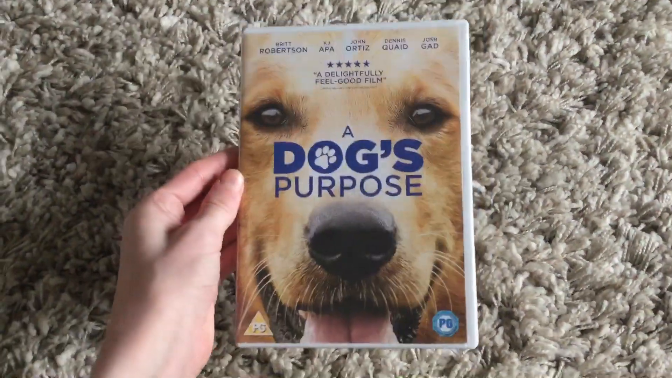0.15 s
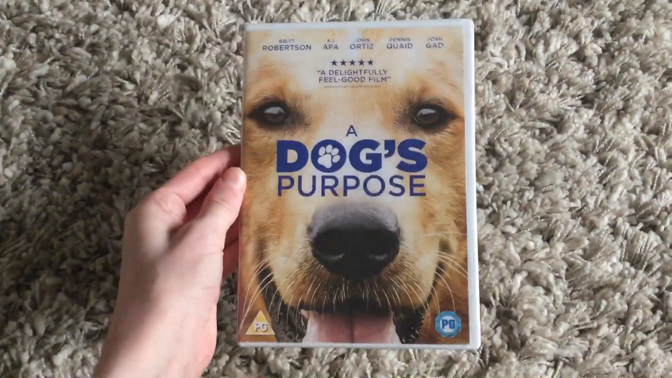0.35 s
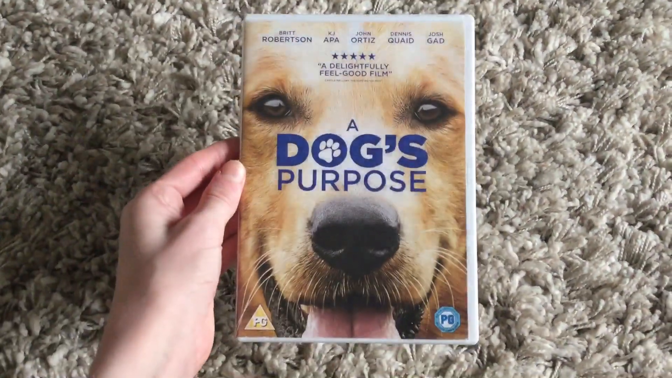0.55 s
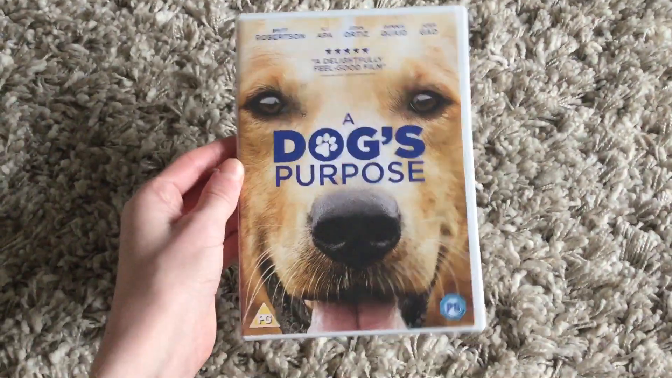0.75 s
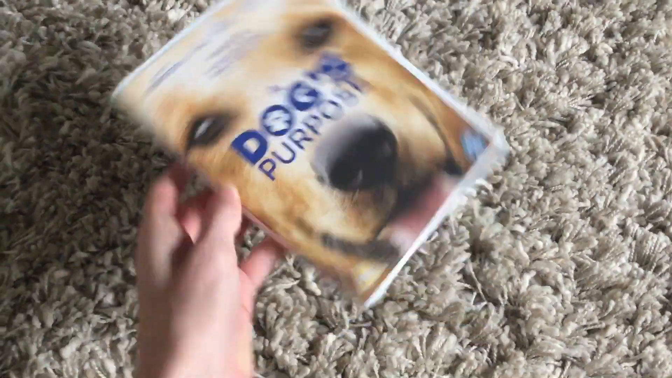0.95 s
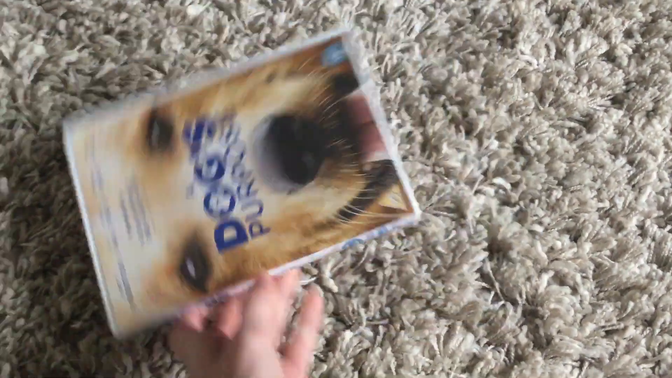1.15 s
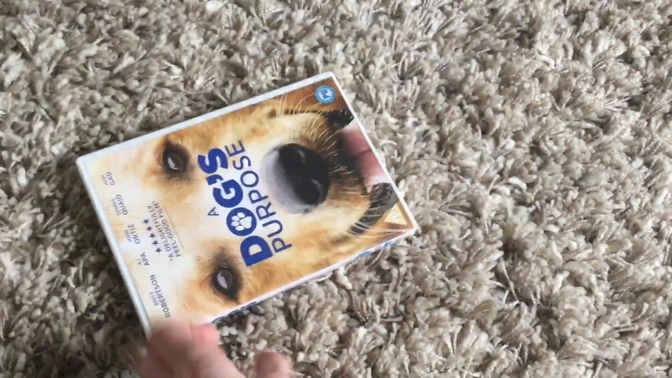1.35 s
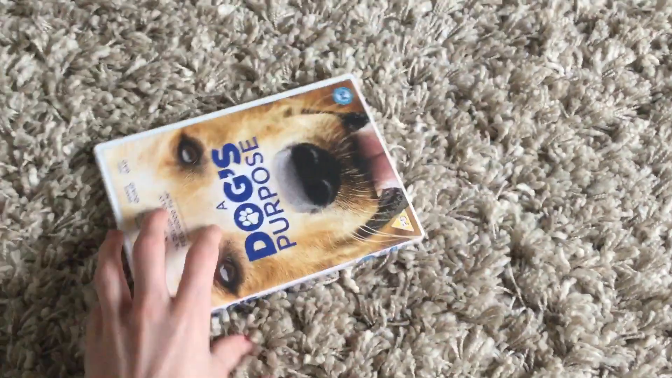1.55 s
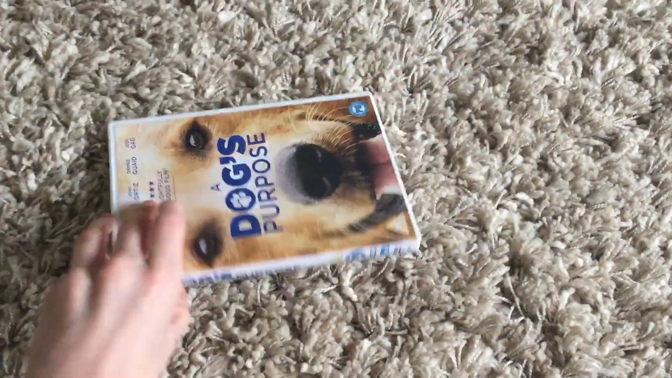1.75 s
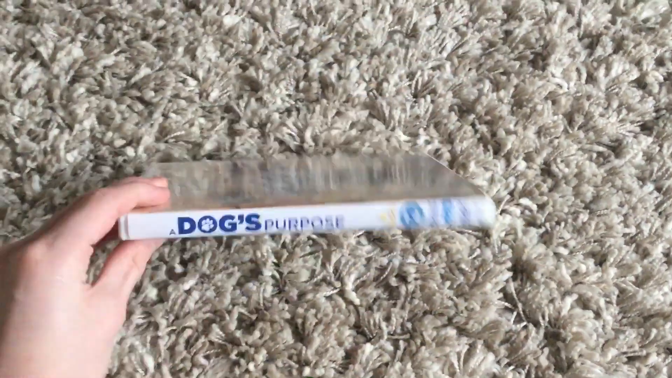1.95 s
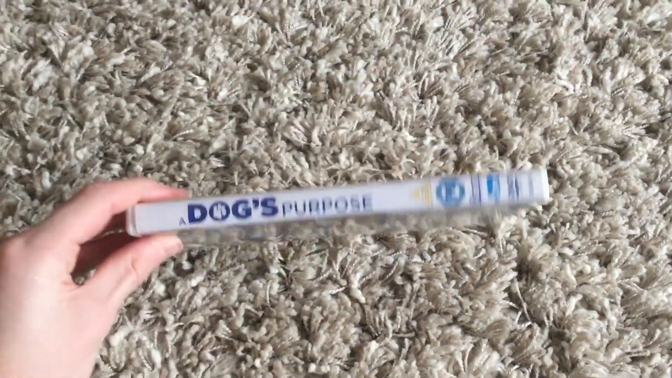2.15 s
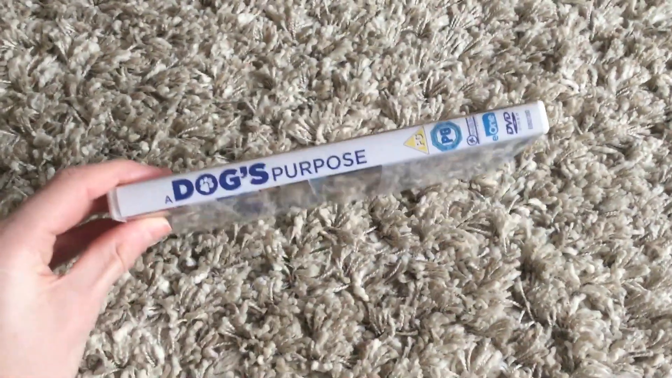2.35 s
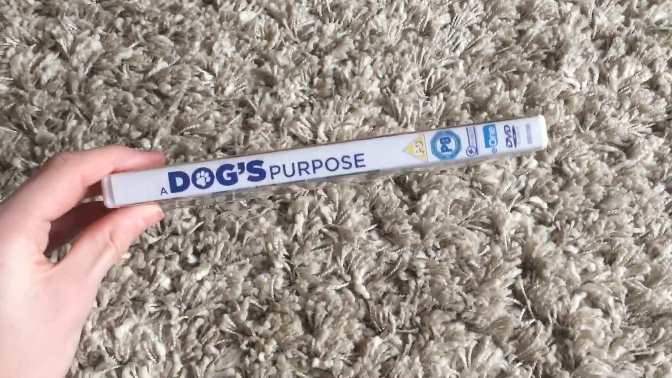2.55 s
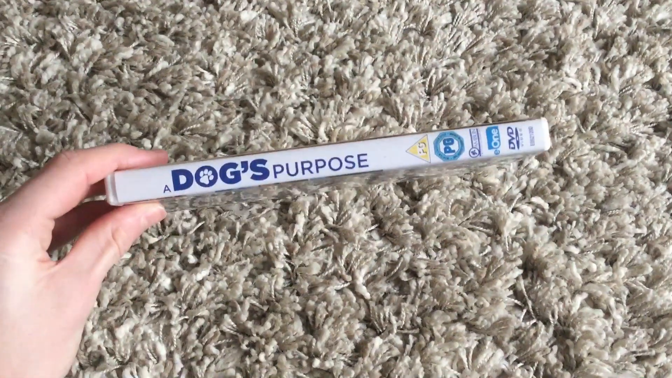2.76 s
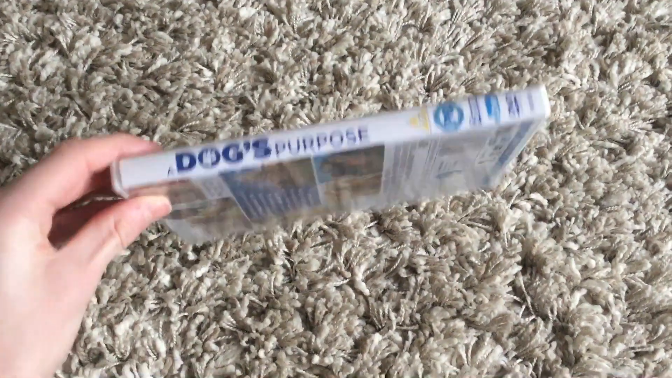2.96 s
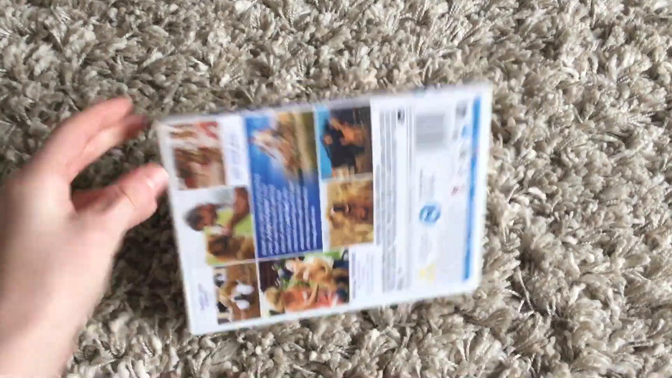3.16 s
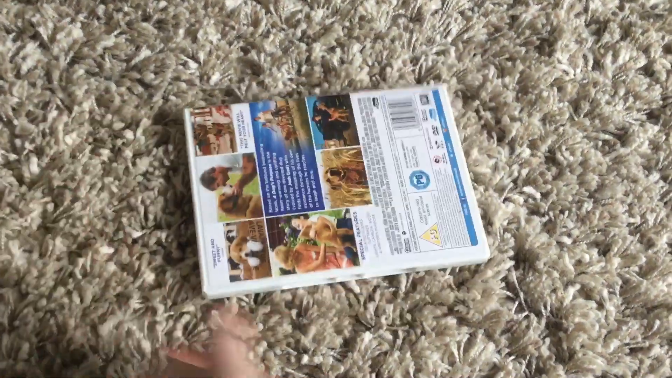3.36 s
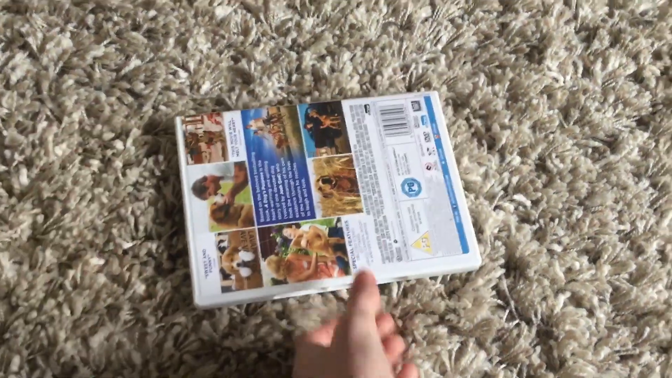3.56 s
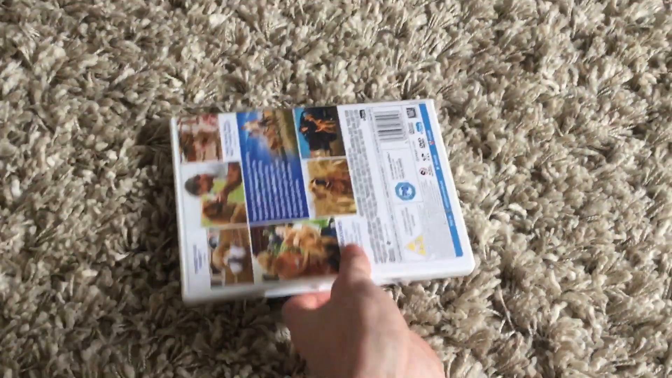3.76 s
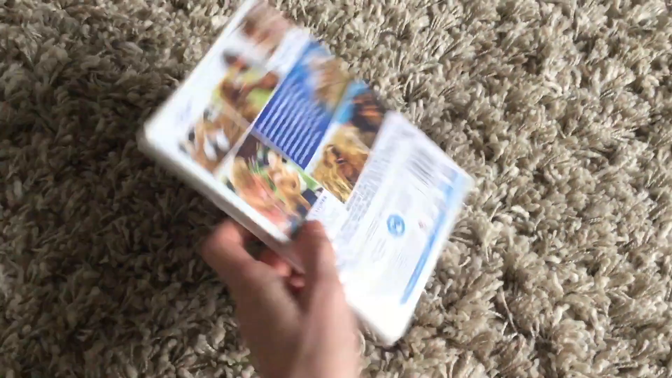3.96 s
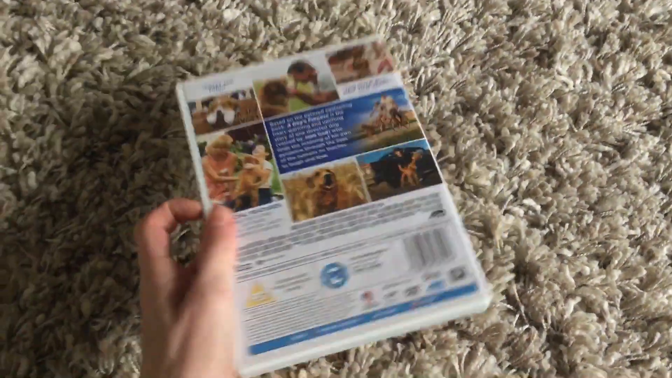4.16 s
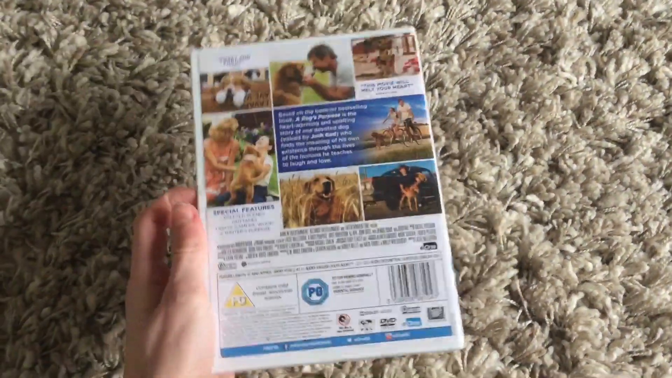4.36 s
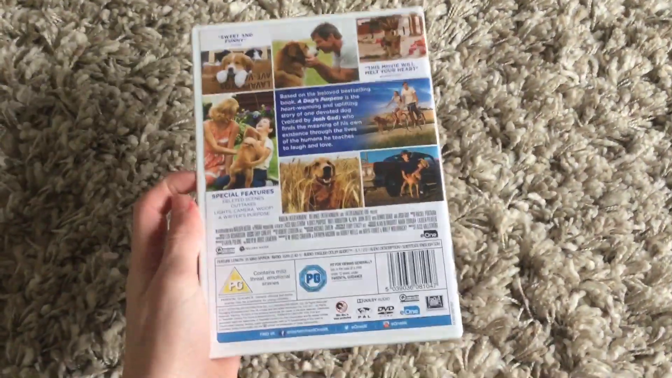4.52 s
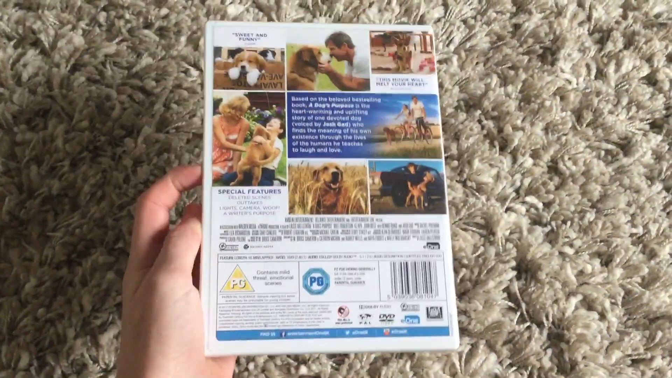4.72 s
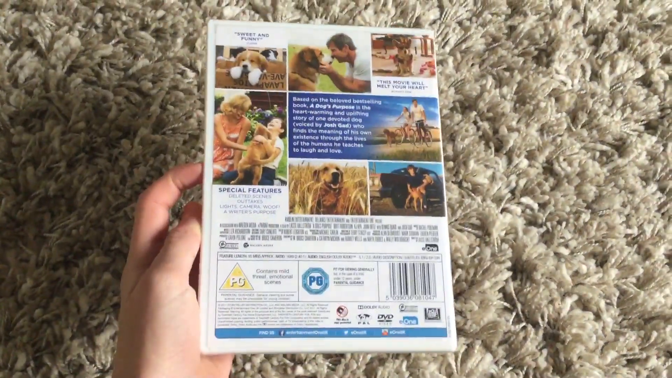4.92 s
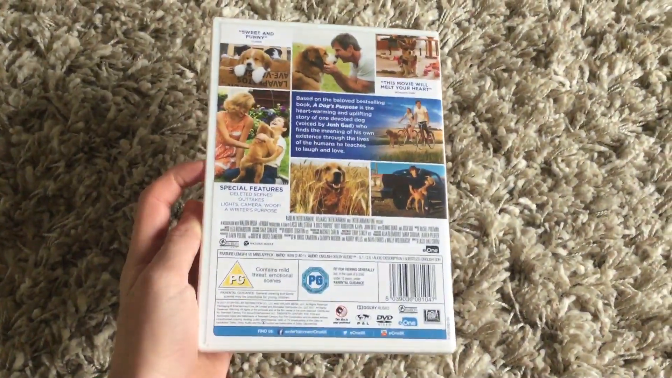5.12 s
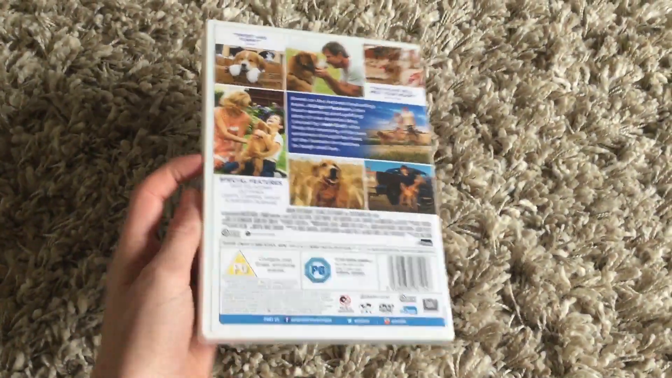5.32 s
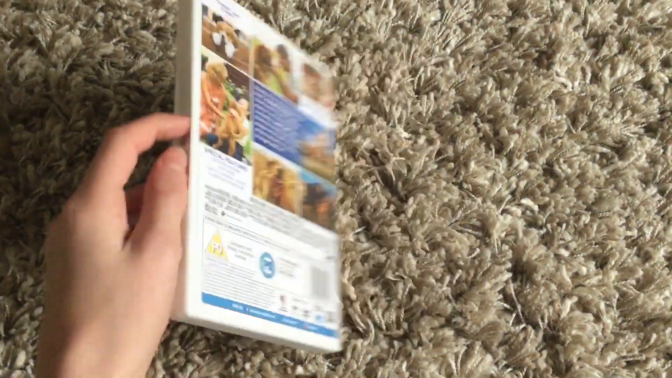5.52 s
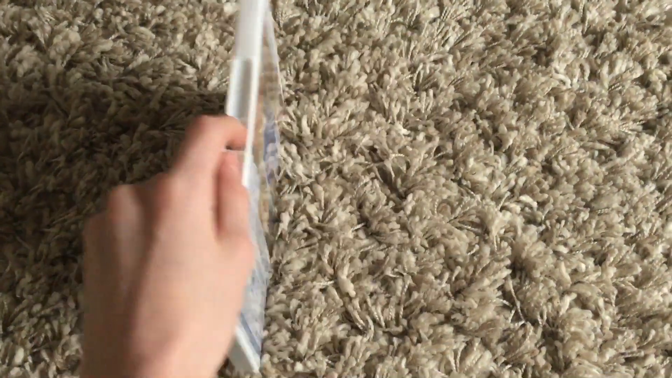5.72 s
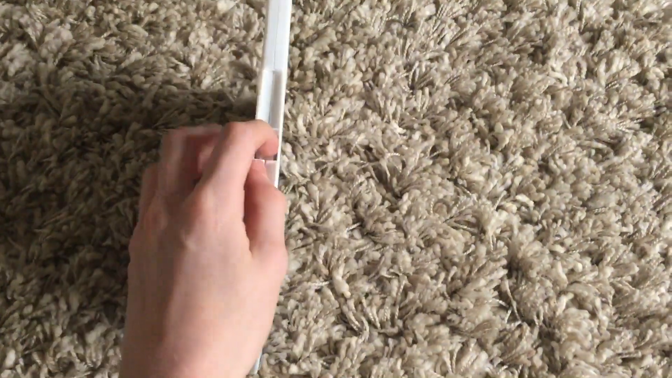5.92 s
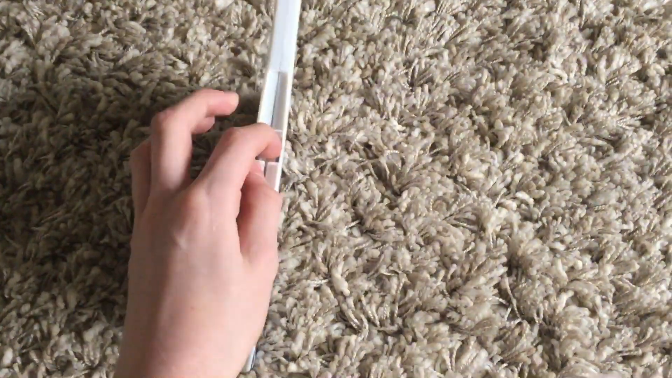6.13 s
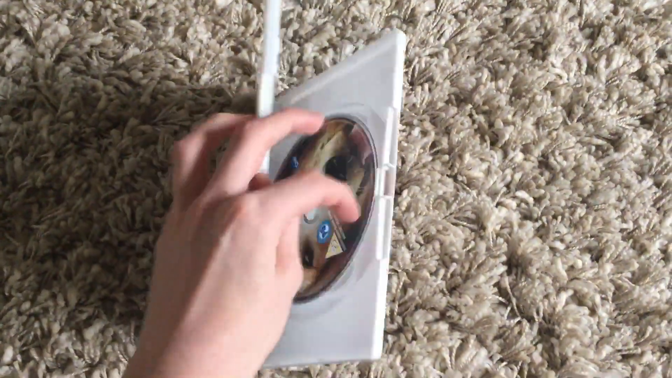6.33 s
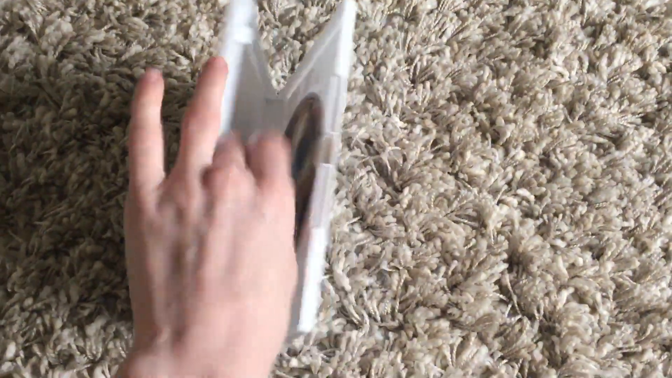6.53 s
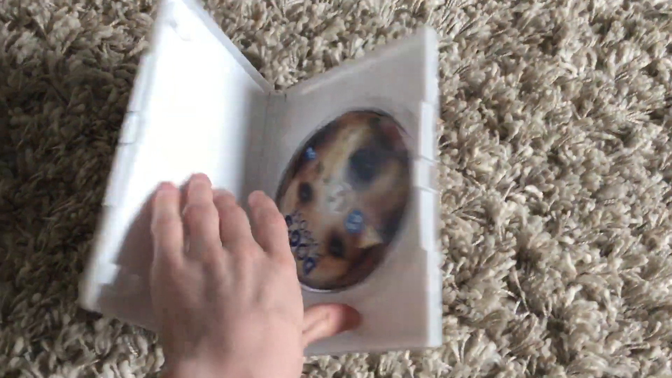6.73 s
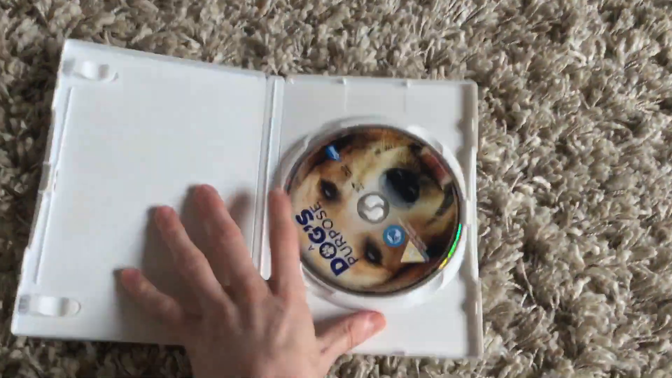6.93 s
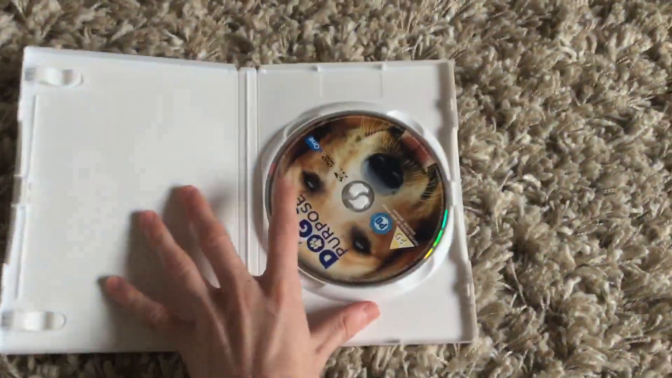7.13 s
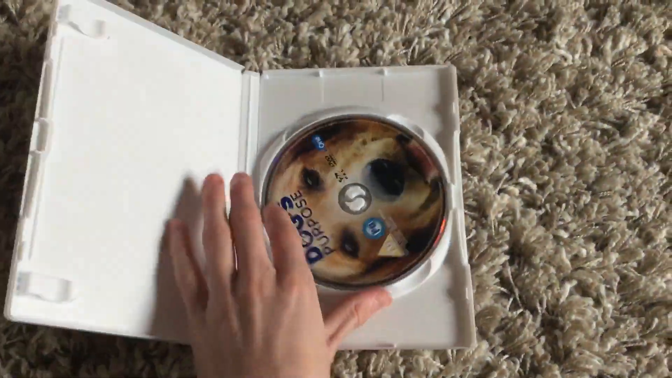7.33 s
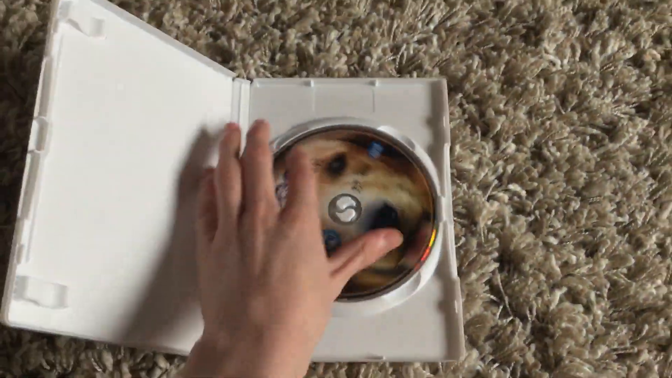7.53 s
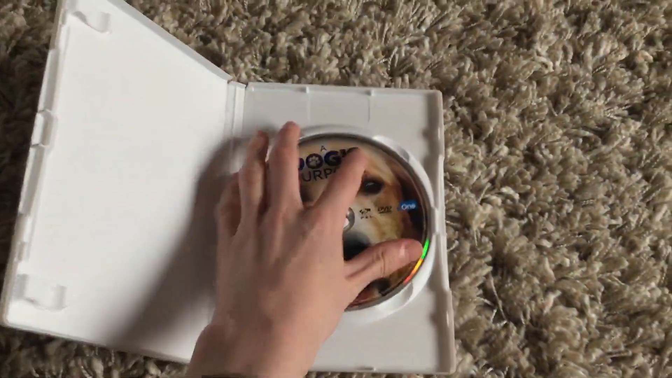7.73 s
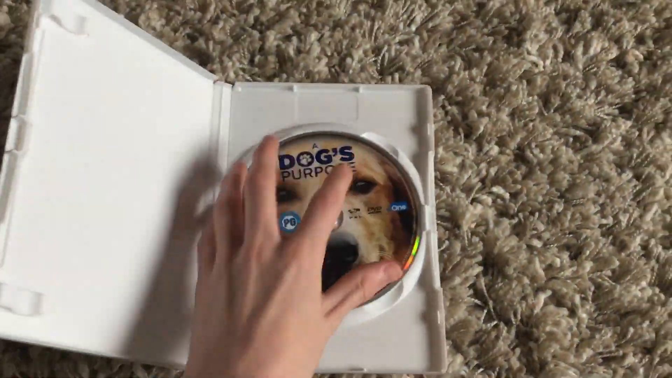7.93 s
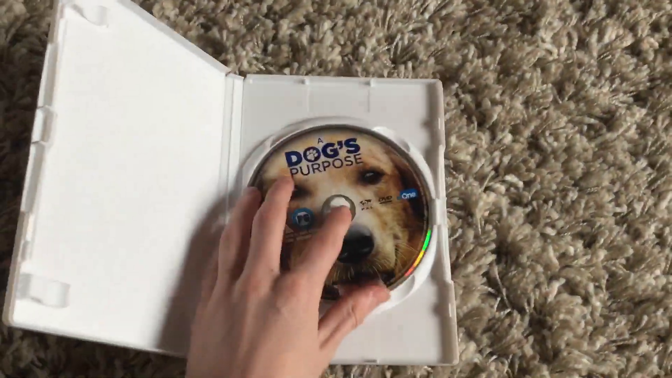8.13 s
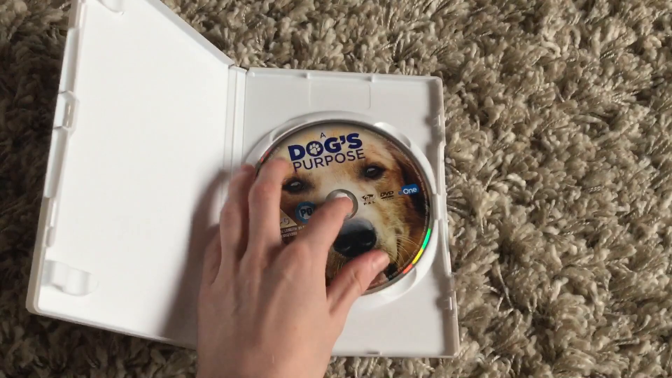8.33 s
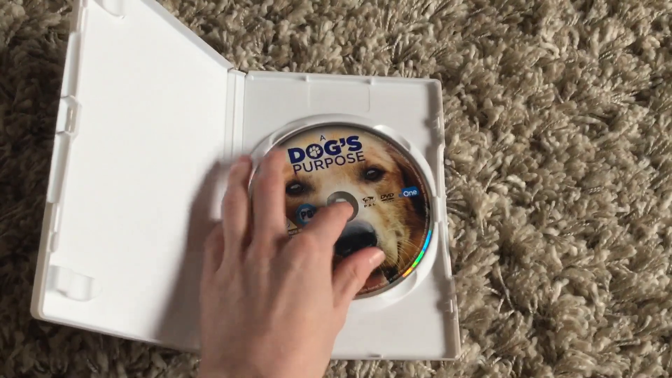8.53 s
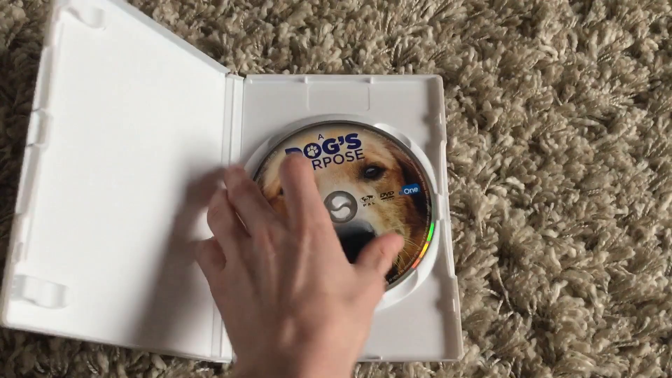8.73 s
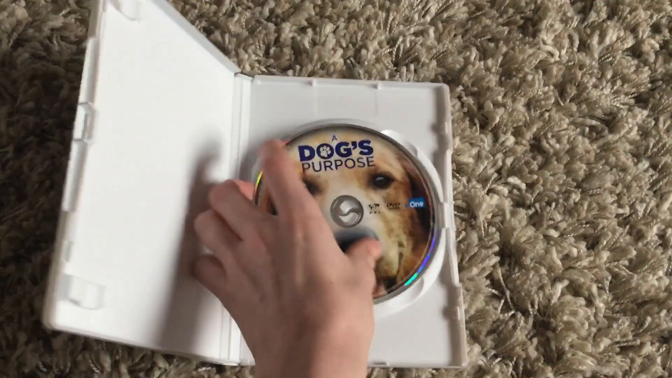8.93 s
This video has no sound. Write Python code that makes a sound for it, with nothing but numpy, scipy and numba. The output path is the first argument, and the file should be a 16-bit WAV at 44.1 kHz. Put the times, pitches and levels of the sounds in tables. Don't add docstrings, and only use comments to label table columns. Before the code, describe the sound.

A quiet, small furnished room with a faint steady air hush; the microphone is close. Nearly silent at first, with tiny finger creaks from 0.75 s. Padded knocks and light plastic clicks come around 1.2, 1.5, 1.6 and 1.9 s. After a lull, the hollow case shifts near 3 s and drops at 3.2 s with a bright bouncing clatter and a dull carpet thump, then grinds briefly. From 3.7 to 4.5 s it is turned with crisp ticks, knocks and seam creaks. Mostly quiet with faint touches until the latches burst open at 6.25 s, a loud hard snap. The lid chatters and slides at 6.5-6.7 s, with small squeaks. A catch sounds at 7.04 s, then the disc scrapes and squeaks round at 7.25-7.7 s. Clicks at 8.0 s, the loudest sharp pop at 8.42 s, another snap at 8.76 s, then rattles and a final scrape near 9 s.

```python
import sys
import numpy as np
from scipy import signal
from scipy.fft import rfft, irfft, next_fast_len
from scipy.io import wavfile
from scipy.ndimage import uniform_filter1d
from numba import njit

SR = 44100
rng = np.random.default_rng(int(sys.argv[2]) if len(sys.argv) > 2 else 0)


def field_ratio(decibels):
    return 10 ** (np.asarray(decibels, dtype=float) / 20)


def inscribe(sig):
    pcm = np.round(np.clip(np.atleast_2d(sig).T, -1, 1) * 32767)
    wavfile.write(sys.argv[1], SR, pcm.astype(np.int16))


N = 400428
COARSE_S = np.arange(0, N + 16, 16) / SR


def band(x, lo_hz, hi_hz):
    return signal.sosfilt(signal.butter(2, [lo_hz, hi_hz], "bandpass", fs=SR, output="sos"), x)


def unit(x):
    return x / np.sqrt(np.mean(x ** 2))


def fine(control):
    return np.interp(np.arange(N) / SR, COARSE_S, control)


def curve(rows, column, rest=-120):
    rows = np.array(rows)
    return np.interp(COARSE_S, rows[:, 0], rows[:, column], left=rest, right=rest)


def swell(s, hold_s, rise_db_per_s, fall_db_per_s):
    before_s = np.maximum(s - COARSE_S, 0)
    after_s = np.maximum(COARSE_S - s - hold_s, 0)
    return -rise_db_per_s * before_s - fall_db_per_s * after_s


def leader(db, hz):
    top = np.argmax(db, axis=0)[None]
    top_db = np.take_along_axis(np.array(db), top, axis=0)[0]
    return top_db, np.take_along_axis(np.array(hz), top, axis=0)[0]


def walk(rate_hz):
    hold = int(SR / rate_hz)
    levels = rng.standard_normal(N // 30)[:N // hold + 1]
    return 1.2 * uniform_filter1d(np.repeat(levels, hold), hold)[:N]


def coloured(points):
    hz, db = np.transpose(points)
    size = next_fast_len(N)
    f = np.maximum(np.arange(size // 2 + 1) * SR / size, 1)
    gain = field_ratio(np.interp(np.log(f), np.log(hz), db))
    return unit(irfft(rfft(rng.standard_normal(size)) * gain, size)[:N])


@njit
def svf(x, hz, width_hz):
    y, b, l = np.empty(len(x)), 0., 0.
    for i in range(len(x)):
        g, k = np.tan(np.pi * hz[i] / SR), width_hz / hz[i]
        v = (b + g * (x[i] - l)) / (1 + g * (g + k))
        b, l, y[i] = 2 * v - b, l + 2 * g * v, k * v
    return y


def ring(x, hz, width_hz):
    return svf(x, np.full(len(x), 1. * hz), 1. * width_hz)


# (frequency [Hz], width [Hz], level [dB])
SHUT_MODES = [(660, 94, -1), (1000, 110, -3), (1220, 140, -6.5), (2020, 310, -9), (2160, 59, -8),
              (2590, 96, -7.5), (3130, 210, -11), (3900, 140, -7.5), (4540, 340, -16), (5760, 490, -14.5),
              (6680, 480, -14.5), (8580, 700, -13), (11100, 1300, -26.5)]
# (frequency [Hz], width [Hz], level [dB])
OPEN_MODES = [(635, 120, -10), (1050, 620, -9.5), (1432, 130, -1.5), (1680, 880, -10), (2130, 840, -17),
              (2550, 170, -21.5), (3060, 110, -9.5), (3750, 53, -14.5), (4870, 100, -13),
              (5380, 1700, -18.5), (7080, 630, -11), (8460, 750, -16.5), (9700, 3700, -21.5),
              (11320, 7800, -24.5)]
MODES = SHUT_MODES + OPEN_MODES
OPENED_S = 6.24


def heard(k, s):
    return (k >= len(SHUT_MODES)) == (s >= OPENED_S)


def resonance(f, hz, width_hz):
    return 1j * f * width_hz / (hz ** 2 - f ** 2 + 1j * f * width_hz)


def shell(f, s, spread_db, direct_db):
    response = field_ratio(direct_db)
    for k, (hz, width_hz, db) in enumerate(MODES):
        gain = (-1) ** k * heard(k, s) * field_ratio(db + spread_db[:, k, None])
        response = response + gain * resonance(f, hz, width_hz)
    return response


# (low edge [Hz], high edge [Hz])
HIT_BANDS = [(170, 750), (750, 6000), (6000, 16000)]
HIT_SIZE, LEAD = 4096, 900


def hits(table, ring_db, ring_q, rise, thud_stretch, lead_db, edge):
    s, db, hz, thud_db, crack_db, t60_ms = (c[:, None] for c in np.transpose(table))
    chance = rng.standard_normal((len(table), HIT_SIZE + len(MODES)))
    noise, spread_db = chance[:, :HIT_SIZE], 2.5 * chance[:, HIT_SIZE:]
    t = (np.arange(HIT_SIZE) - LEAD) / SR
    lead_in = (t < 0) * field_ratio(lead_db) * np.exp(np.minimum(t, 0) / 0.0024)
    f = np.arange(HIT_SIZE // 2 + 1) * SR / HIT_SIZE
    body = shell(f, s, spread_db, -22) + field_ratio(ring_db) * resonance(f, hz, hz / ring_q)
    sound = 0
    for edges_hz, rel_db, stretch in zip(HIT_BANDS, (thud_db, 0, crack_db), (thud_stretch, 1, .8)):
        age = np.maximum(t, 0) / (np.maximum(t60_ms, 3) * stretch / 1000)
        push = (1 - np.exp(-age / rise)) * field_ratio(-60 * age) + lead_in * (stretch == 1)
        force = push * noise + edge * (t == 0)
        part = band(irfft(rfft(force) * body, HIT_SIZE), *edges_hz)
        sound = sound + field_ratio(db + rel_db) * part / np.abs(part).max(axis=1, keepdims=True)
    out = np.zeros(N + HIT_SIZE)
    np.add.at(out, (s * SR).astype(int) - LEAD + np.arange(HIT_SIZE), sound)
    return out[:N]


THUD_DB = dict(knock=-4.5, click=-93, tick=-21, tray=-2.5, snap=-14.5, latch=-13, chatter=-7.5)
CRACK_DB = dict(knock=-10.5, click=-12.5, tick=-25)


def contacts(table, kind):
    rows = []
    for s, db, hz, t60_ms, *own in table:
        crack_db = own[0] if own else CRACK_DB[kind]
        rows.append((s, db, hz, THUD_DB[kind], crack_db, t60_ms))
    return rows


def taps(table, kind):
    return hits(contacts(table, kind), 2.6, 21, 0.0038, 2.3, -20.0, 2.8)


def patches(rows, q, grain_db):
    out = np.zeros(N + SR)
    for s, length_s, db, from_hz, to_hz in rows:
        size = int(length_s * SR)
        noise, grain = rng.standard_normal((2, SR // 4))[:, :size]
        hz = np.geomspace(from_hz, min(to_hz, .4 * SR), size)
        slips = noise * field_ratio(grain_db * unit(uniform_filter1d(grain, size=90)))
        width_hz = np.sqrt(from_hz * to_hz) / q
        tone = unit(svf(svf(slips, hz, width_hz), hz, width_hz))
        out[int(s * SR):][:size] += field_ratio(db) * tone * np.sqrt(np.hanning(size))
    return out[:N]


def swings(table, rise_s):
    out, t = np.zeros(N + SR), np.arange(SR) / SR
    for s, db, hz, t60_s in table:
        envelope = field_ratio(db - 60 * t / t60_s) * (1 - np.exp(-t / rise_s))
        out[int(s * SR):][:SR] += envelope * np.sin(2 * np.pi * hz * t)
    return out[:N]


def grinding(rows, modes, grip, grain_db, direct_db):
    bite, fade, patchy_db = grip
    grains = band(rng.standard_normal(N) * field_ratio(grain_db * walk(700)), 400, 12000)
    level_db = np.max([db + swell(s, hold_s, bite, fade) for s, hold_s, db in rows], axis=0)
    gains = [(-1) ** k * field_ratio(db + patchy_db * walk(45)) for k, (_, _, db) in enumerate(modes)]
    drift = 1 + .015 * walk(25)

    def bent(x):
        out = field_ratio(direct_db) * x
        for gain, (hz, width_hz, _) in zip(gains, modes):
            out = out + gain * svf(x, hz * drift, 1. * width_hz)
        return out

    return bent(grains * fine(field_ratio(level_db))) / np.std(bent(grains))


# (frequency [Hz], level [dB per Hz])
AIR_COLOUR = [(120, -16), (200, -3), (347, -7.5), (374, -11), (581, -15), (991, -19), (1660, -23.5),
              (2070, -25.5), (3530, -24.5), (10800, -32), (16200, -29.5)]
# (frequency [Hz], width [Hz], level [dB])
DUCT_MODES = [(1650, 150, -86), (3660, 220, -91.5), (8850, 1100, -89.5)]


def air():
    ducts = sum(field_ratio(db) * unit(ring(rng.standard_normal(N), hz, w)) for hz, w, db in DUCT_MODES)
    return field_ratio(-70.5 + .5 * walk(1.1)) * coloured(AIR_COLOUR) + ducts


# (frequency [Hz], level [dB per Hz])
THUMP_COLOUR = [(15, -43), (25, -20), (64, 7), (182, -2.5), (300, -19), (390, -41.5), (660, -120)]
# (time [s], level [dB], frequency [Hz], build [dB/s], fade [dB/s])
BUMPS = [(0.53, -67, 151.9, 4.5, 7.5), (1.259, -55.5, 91.1, 158.5, 234.5), (1.62, -61.5, 154, 30.5, 40.5),
         (2.219, -60, 99.2, 43, 33.5), (3.242, -46, 147.3, 117, 64.5), (3.72, -59.5, 104, 20, 18),
         (3.939, -56, 166.7, 51, 140), (5.92, -62.5, 93.1, 19, 26.5), (6.253, -40.5, 124.8, 367.5, 166.5),
         (6.653, -60, 161.1, 28.5, 92.5), (7.16, -60.5, 97, 37.5, 10), (8.422, -48.5, 141.8, 540.5, 235),
         (8.75, -58.5, 146, 38.5, 38.5)]
REST_DB, REST_HZ = -69.5, 110


def thumps(width_hz=30, broad=1.0):
    rumble = coloured(THUMP_COLOUR)
    levels_db = [db + swell(s, 0, rise, fall) for s, db, _, rise, fall in BUMPS]
    pitches_hz = [row[2] + 0 * COARSE_S for row in BUMPS]
    db, hz = leader(levels_db + [REST_DB + 0 * COARSE_S], pitches_hz + [REST_HZ + 0 * COARSE_S])
    drifting_hz = uniform_filter1d(fine(hz), size=4000)
    resonant = unit(svf(rumble, drifting_hz, 1. * width_hz))
    return fine(field_ratio(db)) * unit(resonant + broad * band(rumble, 50, 290))


# (time [s], peak [dB], ring [Hz], rattle t60 [ms])
CLICKS = [(0.754, -49, 3060, 11), (1.135, -57, 1050, 32), (1.248, -47, 1063, 37), (1.485, -43.5, 770, 19),
          (3.732, -41.5, 3750, 41), (3.957, -29, 2550, 18), (4.1558, -39, 3750, 50),
          (4.1815, -35, 1050, 20), (5.31, -54, 1105, 40), (5.427, -55, 917, 100), (5.623, -53, 925, 69),
          (1.345, -62.5, 1490, 20), (4.1463, -43, 3210, 13)]


def clicks():
    return taps(CLICKS, "click")


# (time [s], hold [s], pressure [dB], creak [Hz], fade [dB/s])
CREAKS = [
    (0.77, 0.017, -67, 1020, 249),
    (0.868, 0.014, -67.5, 1036, 282.5),
    (0.98, 0.0097, -66.5, 1053, 249),
    (4.015, 0.03, -62.5, 1200, 130),
    (4.2, 0.15, -73, 1068, 40),
    (6.494, 0.0097, -48.5, 1133, 325),
    (6.68, 0.04, -60, 1398, 149.5),
    (6.79, 0.039, -64, 686, 196),
    (8.2, 0.28, -76, 1100, 67.5),
    (8.6, 0.333, -66, 889, 43),
]
# (time [s], hold [s], pressure [dB], creak [Hz], fade [dB/s])
SCRAPES = [
    (1.22, 0.014, -64, 825, 198.6),
    (1.5, 0.014, -63.5, 940, 201),
    (1.63, 0.018, -68.5, 800, 150.3),
    (3.28, 0.015, -58.5, 760, 99),
    (3.85, .33, -69, 1000, 61.3),
    (6.3, 0.25, -68.5, 1270, 98.3),
    (7.15, .1, -64.5, 727, 97),
    (8.6, 0.35, -70.5, 875, 39.8),
]
# (time [s], hold [s], pressure [dB], creak [Hz], fade [dB/s])
BRUSHES = [
    (1.2, 0.61, -78.5, 820, 100),
    (2.97, 0.57, -82, 800, 39.7),
    (3.7, .3, -73.5, 870, 60),
    (6.47, 0.053, -66.5, 1100, 101),
    (6.76, 0.062, -63, 744, 207),
    (6.94, 0.033, -65.5, 694, 61),
    (8.0, 0.35, -76.5, 934, 50.7),
]
# (time [s], pressure [dB], creak [Hz])
TURN = [
    (7.27, -85.5, 805),
    (7.294, -62.5, 833),
    (7.394, -50, 1160),
    (7.536, -56, 895),
    (7.568, -50, 1050),
    (7.67, -52, 1345),
    (7.70, -77.5, 1272),
]
# (scrape [dB], creak [dB], hiss [dB])
CREAK_MIX = (-17, .1, -14.5)
SCRAPE_MIX = (0.11, -1.5, -8)
BRUSH_MIX = (0, -4.5, 0.072)
# (creak [dB], hiss [dB])
TURN_MIX = (-12, -20.5)
TURN_SCRAPE_DB = -16
GRIP_DB_PER_S, SAG = 548.5, 0.037


def strokes():
    press, hz, mix = [curve(TURN, 1)], [curve(TURN, 2)], [(TURN_SCRAPE_DB, *TURN_MIX)]
    for table, shares in ((CREAKS, CREAK_MIX), (SCRAPES, SCRAPE_MIX), (BRUSHES, BRUSH_MIX)):
        for s, hold_s, db, creak_hz, fade in table:
            below_db = swell(s, hold_s, GRIP_DB_PER_S, fade)
            press.append(db + below_db)
            hz.append(creak_hz * field_ratio(SAG * below_db))
            mix.append(shares)
    scrape, creak, hiss = (np.array(press) + share[:, None] for share in np.transpose(mix))
    return map(fine, (scrape.max(axis=0), *leader(creak, hz), hiss.max(axis=0)))


def rubbing(slip_db=4.0, flutter_db=0.5, flutter_hz=220, patchy_db=3.5, patchy_hz=40,
            creak_width_hz=150, catch_db=2.0, catch_hz=60):
    t = np.arange(N) / SR
    bursts = np.clip(walk(flutter_hz), -2, 1.8)
    noise = rng.standard_normal(N)
    jolts = np.minimum(rng.exponential(size=N), 5)
    slips = noise * field_ratio(slip_db * jolts + flutter_db * bursts + catch_db * walk(catch_hz))
    shaken = field_ratio(-29.0) * slips
    for k, (hz, width_hz, db) in enumerate(MODES):
        on = heard(k, t)
        shaken[on] += field_ratio(db + patchy_db * walk(patchy_hz)[on]) * ring(slips[on], hz, width_hz)
    scrape_db, creak_db, creak_hz, hiss_db = strokes()
    creak = unit(svf(slips, np.maximum(creak_hz, 500.), 1. * creak_width_hz))
    creak = creak + 0.65 * unit(band(shaken, 560, 1300))
    hiss = 0.37 * unit(band(shaken, 3400, 6800)) + 1.5 * unit(band(slips, 3800, 12000))
    scrape = field_ratio(scrape_db) * unit(band(shaken, 1500, 4500))
    return scrape + field_ratio(creak_db) * unit(creak) + field_ratio(hiss_db) * unit(hiss)


# (time [s], length [s], level [dB], from [Hz], to [Hz])
SQUEAKS = [(6.482, .055, -55, 1800, 2050), (6.655, .08, -55, 1550, 1350), (6.75, .16, -60, 850, 640),
           (6.775, .085, -59, 1150, 1100), (8.61, .022, -57, 2700, 2950), (8.598, .05, -61, 700, 760),
           (7.328, .014, -51, 3100, 3100), (7.492, .014, -50, 3150, 3150), (7.63, .016, -53, 3850, 3850),
           (7.664, .018, -55, 2100, 1900), (7.565, .012, -49, 1800, 1800), (7.59, .014, -50, 1850, 2000),
           (7.45, .016, -50, 1800, 1800), (7.408, .014, -49, 2500, 2500), (7.335, .03, -57, 1050, 1200),
           (8.79, .05, -59, 2150, 2150), (9.03, .04, -50, 4600, 4500), (.775, .03, -66, 1030, 1030),
           (.86, .035, -66, 1040, 1040), (.97, .035, -65, 1050, 1050)]


def squeaks():
    return patches(SQUEAKS, 5.0, 4.0)


# (time [s], peak [dB], ring [Hz], rattle t60 [ms])
KNOCKS = [(1.187, -44, 1810, 63), (1.227, -37, 895, 8.7), (1.235, -38, 940, 7), (1.497, -35.5, 1840, 21),
          (1.514, -39.5, 1130, 33), (1.617, -43, 840, 160), (1.638, -45.5, 1160, 97),
          (1.849, -48, 1150, 100), (1.889, -36.5, 1060, 18), (3.151, -42.5, 3610, 36),
          (3.874, -48, 3130, 80), (3.912, -31.5, 750, 20), (3.939, -37.5, 3200, 7.9), (4.094, -41, 890, 25),
          (4.714, -54.5, 1040, 45), (4.779, -53.5, 1018, 21.6), (6.174, -57, 1118, 16.4)]


def knocks():
    return taps(KNOCKS, "knock")


# (time [s], peak [dB], frequency [Hz], t60 [s])
BLOWS = [
    (1.225, -49.5, 78.4, 0.48),
    (3.25, -36.5, 151, 0.037),
    (3.915, -32, 199, 0.055),
    (6.245, -20, 142.3, 0.032),
    (8.415, -24.5, 225, 0.027),
]


def blows():
    return swings(BLOWS, 0.00092)


# (time [s], length [s], level [dB], from [Hz], to [Hz])
RUSTLES = [(8.395, .023, -45, 3000, 3600), (8.416, .022, -31, 4400, 4000), (3.84, .07, -65, 4200, 4200),
           (3.83, .08, -69, 10500, 11500), (3.722, .006, -63, 8000, 8000), (3.934, .008, -52, 6000, 6000),
           (4.143, .045, -68, 8500, 8500), (3.982, .03, -53, 3000, 2800), (6.66, .2, -62, 6500, 5000),
           (8.655, .03, -63, 5000, 7000), (6.46, .02, -61, 4500, 4500), (6.93, .07, -67, 9000, 9000),
           (8.415, .024, -39, 12500, 12000), (3.105, .05, -62, 3500, 3800), (3.749, .013, -47, 3300, 3300),
           (3.768, .013, -50, 2700, 2700), (1.49, .04, -58, 350, 300), (1.615, .05, -60, 300, 280),
           (3.19, .12, -54, 330, 300), (9.025, .05, -45, 1400, 1500), (3.9, .1, -57, 330, 300)]


def rustles():
    return patches(RUSTLES, 1.2, 3.0)


# (time [s], peak [dB], ring [Hz], rattle t60 [ms])
TICKS = [
    (1.832, -43.5, 700, 10),
    (2.979, -57.5, 2550, 82),
    (3.7507, -39, 3170, 20),
    (3.796, -41.5, 3100, 20),
    (3.9228, -32.5, 2550, 35),
    (3.977, -37, 3960, 24),
    (4.119, -29, 1090, 13),
    (5.76, -48.5, 3775, 90),
    (6.468, -49, 1830, 48),
    (6.487, -39, 1130, 27),
]


def ticks():
    return taps(TICKS, "tick")


# (frequency [Hz], width [Hz], level [dB])
SEAM_MODES = [(618, 92, -3.5), (1000, 110, 3.5), (1200, 148, -1.5), (2070, 58, -3.5), (2540, 120, 0.5),
              (3200, 230, -6), (3800, 100, -1.5), (4530, 91.7, -7), (5130, 195, -16.5), (6400, 260, -20.5)]
# (time [s], hold [s], level [dB])
GRINDS = [(3.02, .015, -62.5), (3.162, .03, -54.5), (3.21, 0.033, -46.5), (3.312, 0.03, -48.5),
          (3.359, 0.012, -47), (3.372, .007, -46), (3.384, 0.0067, -54), (3.412, 0.0074, -48),
          (3.432, 0.028, -60.5), (3.77, 0.0089, -54.5), (3.812, .01, -61), (3.99, 0.025, -52),
          (4.085, .005, -54.5), (4.146, .004, -50), (4.198, .005, -55), (4.208, 0.008, -53),
          (4.244, 0.0053, -57), (4.279, .006, -57), (4.302, 0.0059, -59), (4.371, 0.011, -57.5),
          (4.398, 0.0086, -59), (4.424, 0.0071, -57.5), (4.452, 0.0072, -77), (4.493, .004, -66),
          (4.506, 0.0059, -61.5), (4.745, 0.012, -53.5)]
# (bite [dB/s], fade [dB/s], patchiness [dB])
SEAM_GRIP = (6000, 1400, 2.5)


def seam_grinds():
    return grinding(GRINDS, SEAM_MODES, SEAM_GRIP, 3.0, -26.5)


# (time [s], peak [dB], ring [Hz], rattle t60 [ms], crack [dB])
SNAPS = [(3.196, -24, 3750, 52, -33.5), (3.204, -27.5, 2380, 7.5, -2), (3.219, -42, 3130, 20, -5),
         (3.231, -29, 3760, 13, -26.5), (3.247, -21, 4030, 28, -6), (3.2525, -17, 2616, 32, -10.5),
         (3.265, -20, 3200, 28, -31), (3.273, -24.5, 2537, 38, -24.5), (3.284, -25, 3350, 12, -5.5),
         (3.303, -32, 4060, 13, -6.5), (6.257, -11.5, 4845, 59, 0), (6.2625, -13, 3137, 9, -17.5),
         (6.266, -14, 4210, 13, -9), (6.278, -14, 4370, 33, 1.5), (6.292, -25, 3953, 26, -29.5),
         (6.31, -26.5, 1120, 16, -23), (8.422, -14, 3143, 25, -13), (8.427, -14, 1900, 32, -5),
         (8.432, -29.5, 1890, 11, -26)]


def snaps():
    return hits(contacts(SNAPS, "snap"), 2.6, 24, 0.069, 2.0, -21.5, 2.0)


# (time [s], peak [dB], frequency [Hz], t60 [s])
POPS = [(3.1965, -19.5, 3800, .015), (6.2497, -8, 1216, 0.018), (8.4095, -19, 3070, .035),
        (8.4159, 6.5, 2645, 0.0058), (8.3975, -40, 3100, 0.027), (8.7578, -12, 2300, .004),
        (7.0385, -24, 2300, .004), (6.2487, -9, 3500, .006), (6.2495, -21, 390, .04),
        (6.2498, -13, 2100, .007), (8.4156, -9.5, 12310, 0.0076), (8.426, -17, 5450, 0.0212),
        (8.431, -22, 1900, 0.017)]


def pops():
    return swings(POPS, 0.0005)


# (time [s], peak [dB], ring [Hz], rattle t60 [ms], crack [dB])
LATCHES = [
    (3.249, -13, 3240, 14, -12.5),
    (6.2448, -8, 3363, 8.4, -16),
    (6.2482, -16, 3330, 19, 7),
    (6.2497, -3, 1278, 5.6, -49),
    (7.0382, -27.5, 2094, 14, -5),
    (8.4152, -15, 4500, 10, 3.5),
    (8.758, -15.5, 2270, 8, 0),
]


def latches():
    return hits(contacts(LATCHES, "latch"), 14, 1.3, 0.16, 2.7, -26.0, 1.8)


# (time [s], peak [dB], ring [Hz], rattle t60 [ms], crack
# [dB])
CHATTER = [(6.5365, -24, 4200, 44, -5), (6.5405, -24, 1100, 23, 0.5), (6.546, -27.5, 1100, 31, -8),
           (6.604, -22, 4630, 25, -3.5), (6.611, -22.5, 4470, 25, -4), (6.613, -18, 990, 22, -6.5),
           (6.628, -23.5, 4060, 34, -1.5), (6.636, -27, 1000, 26, -4), (6.649, -29, 4990, 21, -4.5),
           (7.234, -32, 1935, 32, -11.5), (7.241, -31.5, 2020, 37, -7), (7.249, -36, 741, 38, -14),
           (7.039, -34, 2120, 29.6, -13), (8.5955, -34.5, 2820, 28, -9), (8.6525, -40.5, 2520, 30, -6.5),
           (8.7595, -20.5, 2090, 36, -14.5), (8.772, -39, 800, 40, -14.5), (8.4163, -7.5, 2530, 21, -1.5),
           (6.2455, -10.5, 3200, 16, -7.5), (6.296, -26, 2970, 46, -5.5), (8.008, -27, 1860, 28, -9),
           (8.0135, -30, 793, 23, -13.5), (8.318, -45.5, 2330, 9.7, 4.5), (8.9355, -39.5, 2013, 30, -4),
           (8.9495, -27, 1460, 17, -11), (8.9776, -39, 2020, 32, -4), (8.9908, -25, 1830, 9.1, -6),
           (4.742, -41.5, 1300, 17, -16), (8.4175, -17, 4580, 23, -4)]


def chatter():
    return hits(contacts(CHATTER, "chatter"), 0.0, 6.6, 0.049, 2.1, -27.5, 1.0)


# (frequency [Hz], level [dB per Hz])
SLIDE_COLOUR = [(300, -25), (800, -0.5), (1500, -5), (2800, -7.5), (4300, -1.5), (7000, -10.5),
                (12000, -13), (16000, -17)]
# (time [s], hold [s], level [dB], build [dB/s], fade [dB/s])
SLIDES = [
    (6.569, 0.033, -46, 401.5, 150),
    (6.629, 0.025, -43, 900, 200),
    (6.68, 0.015, -52.5, 200, 150),
    (6.804, .04, -64.5, 100.5, 300),
    (8.931, 0.022, -54.5, 600, 500),
    (9.024, .01, -55.5, 698, 100),
    (9.038, 0.018, -40, 350, 250),
]


def sliding(grain_db=2.0, flicker_db=1.5, panel_db=-6):
    grains = coloured(SLIDE_COLOUR) * field_ratio(grain_db * walk(900) + flicker_db * walk(120))
    panels = sum(field_ratio(db + 3 * walk(50)) * ring(grains, hz, w) for hz, w, db in OPEN_MODES[:10])
    level_db = np.max([db + swell(s, hold_s, rise, fall) for s, hold_s, db, rise, fall in SLIDES], axis=0)
    return fine(field_ratio(level_db)) * unit(unit(grains) + field_ratio(panel_db) * unit(panels))


# (time [s], peak [dB], ring [Hz], rattle t60 [ms], crack [dB])
TRAY = [
    (6.662, -38, 1000, 28, -15),
    (6.898, -49, 2160, 90, -22),
    (6.918, -36, 2160, 48, -10),
    (8.7015, -52, 760, 25, -10),
    (8.638, -44, 786, 20, -6),
    (8.73, -56, 880, 19, -11.5),
    (8.853, -48, 777, 29, -20),
    (8.913, -40, 700, 30, -14),
]


def tray():
    return taps(TRAY, "tray")


# (frequency [Hz], width [Hz], level [dB])
DISC_MODES = [(660, 87, -5), (1100, 140, -6.5), (1795, 240, 0), (2160, 25, 2), (2490, 340, -3),
              (3780, 240, -7), (3100, 150, -6), (4670, 190, -13.5), (5380, 130, -13), (6300, 80, -17),
              (6500, 72, -22), (7070, 68, -25), (8400, 130, -29), (9430, 72, -23)]
# (time [s], hold [s], level [dB])
CATCHES = [(7.3, .22, -58), (7.535, 0.15, -59), (7.331, .008, -50.5), (7.346, 0.013, -48.5),
           (7.38, .025, -47), (7.411, .008, -48), (7.43, 0.012, -53), (7.453, 0.011, -46),
           (7.472, 0.011, -47), (7.494, .008, -47), (7.512, .008, -50.5), (7.539, .018, -48),
           (7.568, .004, -44.5), (7.58, .008, -47.5), (7.596, 0.0053, -47.5), (7.612, .012, -53),
           (7.636, .005, -48.5), (7.672, .004, -49)]
# (bite [dB/s], fade [dB/s], patchiness [dB])
DISC_GRIP = (2500, 800, 2)


def disc_catches():
    return grinding(CATCHES, DISC_MODES, DISC_GRIP, 1.8, -23)


def room(x):
    t60_s, tail_db, sparkle_db = 0.27, -19, -2
    t = np.arange(SR // 2) / SR
    noise = rng.standard_normal(len(t))
    tail = band(noise, 260, 9440) - field_ratio(sparkle_db) * band(noise, 10000, 15000)
    tail = tail * field_ratio(-60 * t / t60_s) * np.clip(t / 0.0027, 0, 1)
    return field_ratio(tail_db) * signal.fftconvolve(x, tail / np.sqrt(np.sum(tail ** 2)))[:N]


def scene():
    contact = clicks() + knocks() + ticks() + snaps() + latches() + chatter() + tray()
    friction = rubbing() + squeaks() + rustles() + seam_grinds() + sliding() + disc_catches()
    case = contact + friction
    popping = pops()
    echo = room(case + field_ratio(-7.5) * popping)
    return (air() + thumps() + blows() + case + popping + echo)[None]


def band_limit(x):
    return signal.sosfilt(signal.butter(12, 15450, fs=SR, output="sos"), x)


def record(dry):
    mix = np.clip(dry, -1, 1)
    return band_limit(mix)


dry = scene()
out = record(dry)
inscribe(out)
```